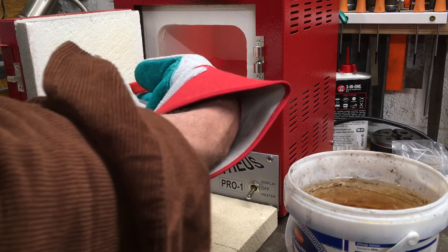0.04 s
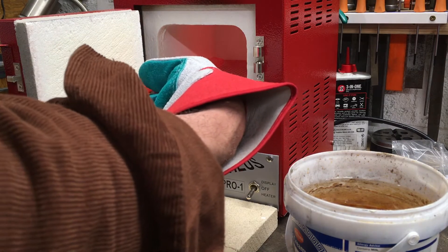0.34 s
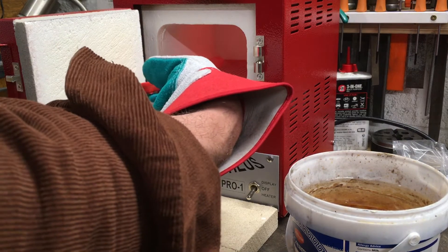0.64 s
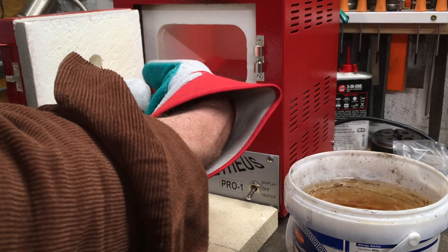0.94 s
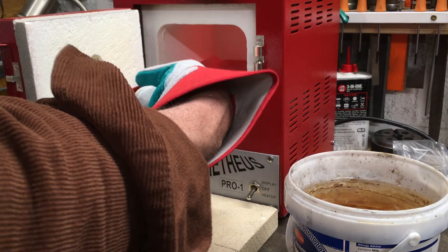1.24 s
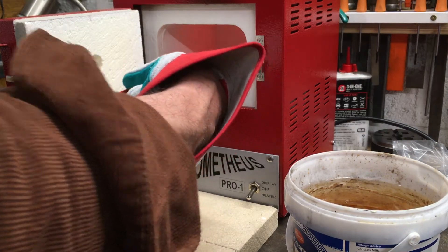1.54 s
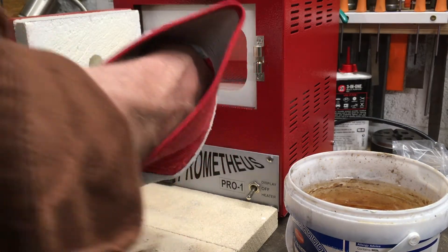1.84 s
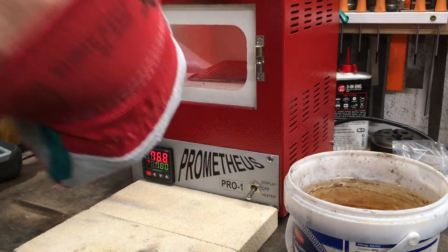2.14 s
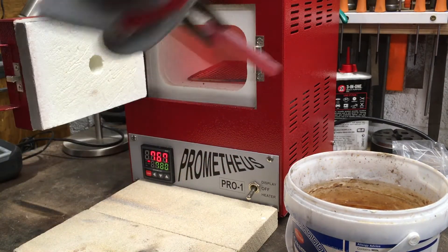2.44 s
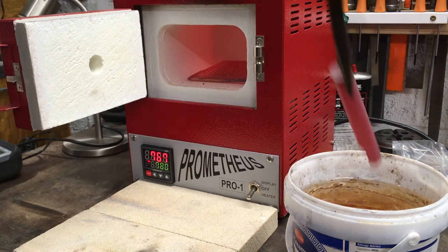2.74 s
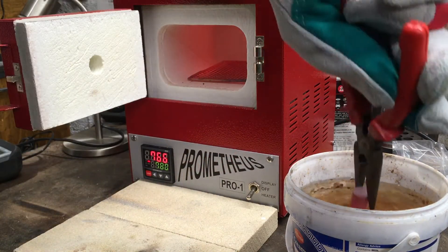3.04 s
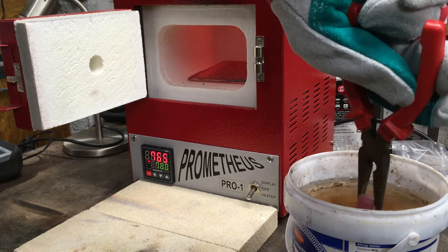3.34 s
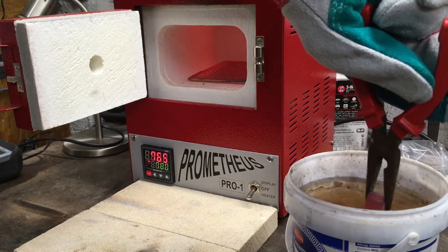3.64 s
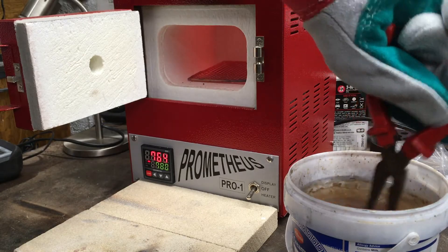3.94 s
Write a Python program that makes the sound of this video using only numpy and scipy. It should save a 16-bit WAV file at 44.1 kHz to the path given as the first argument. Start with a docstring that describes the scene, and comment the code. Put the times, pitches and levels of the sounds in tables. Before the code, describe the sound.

Hot steel sizzling in liquid is the main sound, arriving late. Until then a quiet workshop hums, with faint taps and scrapes of tongs from about 0.5 to 1.9 seconds and a barely audible distant engine rising. At 2.9 seconds the steel plunges in with chirping, spitting bubbles and a brief thin whistle. A fine hiss surges on over a low, growing boil until 4 seconds.

```python
"""A quiet workshop: still air, a low hum and a soft rush. Tongs tap, slide and squeak as they draw
glowing steel from a small kiln, while an engine gathers speed far away. Near 2.9 s the steel plunges
into a plastic bucket: steam bubbles chirp and spit, with a brief, thin whistle. They give way to a
fine sizzle of tiny collapses and steam on the hot metal, over a low, growing boil."""
import sys
import numpy as np
from scipy import signal
from scipy.fft import rfft, irfft
from scipy.io import wavfile

SR = 44100
rng = np.random.default_rng(int(sys.argv[2]) if len(sys.argv) > 2 else 0)


def pcm_store(signal):
    """Save signal as 16-bit PCM."""
    levels = np.round(np.clip(np.atleast_2d(signal), -1, 1) * 32767)
    wavfile.write(sys.argv[1], SR, levels.astype(np.int16).T)


N = 176400
T = np.arange(N) / SR


def amp(db):
    return 10 ** (np.asarray(db) / 20)

def unit(x):
    return x / np.sqrt(np.mean(x ** 2) + 1e-20)

def fader(points):
    """Gain over time from rows that start with seconds and end with dB."""
    rows = np.array(points)
    return amp(np.interp(T, rows[:, 0], rows[:, -1], left=-120))

def equalise(x, curve):
    """Shapes x with an EQ curve that falls steeply beyond its ends; rms 1."""
    hz, db = np.transpose(curve)
    log_hz = np.log(np.fft.rfftfreq(N, 1 / SR) + 1)
    outside = np.maximum(np.log(hz[0]) - log_hz, 0) + np.maximum(log_hz - np.log(hz[-1]), 0)
    gain = amp(np.interp(log_hz, np.log(hz), db) - 60 * outside)
    return unit(irfft(rfft(x) * gain, N))

def noise(curve):
    return equalise(rng.standard_normal(N), curve)

def wander(rate_hz):
    """Random modulation up to about the given rate; rms 1."""
    rolloff = np.exp(-(np.fft.rfftfreq(N, 1 / SR) / rate_hz) ** 2)
    return unit(irfft(rfft(rng.standard_normal(N)) * rolloff, N))

def clicks(per_s, spread_db):
    """Random clicks of uneven size; rms 1."""
    hits = (rng.random(N) < per_s / SR) * rng.choice([-1, 1], N)
    return unit(hits * amp(spread_db * np.minimum(rng.exponential(1, N), 4.5)))

def tone(points, jitter, rate_hz):
    """An unsteady sine that follows rows of seconds, Hz and dB."""
    times, hz, _ = np.transpose(points)
    pitch = np.interp(T, times, hz) * (1 + jitter * wander(rate_hz))
    release = np.clip((times[-1] - T) / .02, 0, 1)
    return np.sqrt(2) * release * fader(points) * np.sin(2 * np.pi * np.cumsum(pitch) / SR)

def add(mix, start_s, sound):
    part = mix[max(round(start_s * SR), 0):][:len(sound)]
    part += sound[:len(part)]


# Colours of the air, its high hiss and the rush. Each row: frequency in Hz, gain in dB.
AIR_EQ = [(22, -28), (40, -4.5), (64, -1.5), (87, -0.5), (161, -9), (263, -9), (416, -19), (775, -22),
          (1160, -19), (4870, -40.5), (15000, -38)]
HISS_EQ = [(2500, -10), (5000, -9), (9500, -12), (10500, -13), (12500, -3), (15500, -8.5)]
RUSH_EQ = [(300, -6), (650, -1.5), (850, -3.5), (1150, 1), (1550, -6.5), (2200, -16), (3500, -40)]
# The hiss comes up as the rush recedes. Each row: time in seconds, level in dB.
HISS_FADER = [(0, -107), (1.6, -88), (2.3, -76.5)]
RUSH_FADER = [(0, -65.5), (1.62, -66.5), (1.85, -77), (2.2, -79)]

def room_tone():
    """Still air, a faint hiss uncovered as the arm moves away, and a soft mid-range rush."""
    air = amp(-61.5) * noise(AIR_EQ)
    return air + fader(HISS_FADER) * noise(HISS_EQ) + fader(RUSH_FADER) * noise(RUSH_EQ)

# Swells and dips of the hum. Each row: time in seconds, level in dB.
HUM_FADER = [(0, -65.5), (.7, -58), (1.25, -55.5), (1.4, -66), (1.6, -57.5), (1.8, -57), (1.9, -64.5),
             (2.3, -58.5), (2.551, -65), (2.8, -56), (3.05, -68), (4, -65)]

def hum(pitch_hz=64.8):
    """One low, slowly wavering tone."""
    return tone([(s, pitch_hz, db) for s, db in HUM_FADER], jitter=.024, rate_hz=5.3)

# Light contacts. Each row: peak time in seconds, decay in seconds, thud, scrape and grit levels in dB.
TOUCH_HITS = [(0.47, 0.059, -56.5, -79, -88), (0.599, 0.0046, -59, -58.5, -68),
              (0.636, 0.002, -54, -78, -51), (0.646, 0.013, -47.5, -67, -57.5),
              (0.705, 0.039, -54, -91, -88), (0.803, .002, -78, -85, -63),
              (1.214, 0.0082, -51.5, -59.5, -51.5), (1.232, 0.027, -48, -61, -69),
              (1.249, 0.0033, -61, -63, -47.5), (1.476, 0.025, -54.5, -61.5, -59.5),
              (1.676, 0.029, -76, -67.5, -61.5), (1.766, 0.0043, -66, -66, -85),
              (2.741, .003, -75, -62, -79), (2.825, 0.0012, -78, -50, -92)]
# Colours of those three layers. Each row: frequency in Hz, gain in dB.
THUD_EQ = [(130, -12.5), (250, 3.5), (350, -4), (480, -17.5), (640, -7.5), (1000, -28)]
SCRAPE_EQ = [(400, 7), (950, -3), (1500, -9), (2400, 4), (3300, -7), (4300, -2), (5000, -11), (12000, -32)]
GRIT_EQ = [(5000, -9.5), (6400, -2), (7800, -10.5), (9100, 0), (10500, -7.5), (12800, 4), (15500, 2)]

def touches(attack_share=.17):
    """Tongs and glove make contact: a soft thud, a scrape and fine grit under one quick envelope."""
    thud = noise(THUD_EQ)
    scrape = equalise(clicks(per_s=8600, spread_db=4.8), SCRAPE_EQ)
    grit = equalise(clicks(per_s=6000, spread_db=3), GRIT_EQ)
    out = np.zeros(N)
    for peak_s, decay_s, thud_db, scrape_db, grit_db in TOUCH_HITS:
        age = (T - peak_s) / decay_s
        envelope = np.exp(-np.maximum(age, -age / attack_share))
        out += envelope * (amp(thud_db) * thud + amp(scrape_db) * scrape + amp(grit_db) * grit)
    return out

# Fine sliding hiss. Each row: time in seconds, level in dB.
SLIDE_FADER = [(.7, -88), (.87, -78), (1.0, -69), (1.19, -74.5), (1.62, -74.5), (1.9, -83)]

def tongs_slide():
    """The tongs slide in the kiln with patchy, ticking grit."""
    patches = amp(2.2 * wander(rate_hz=36))
    return fader(SLIDE_FADER) * patches * equalise(clicks(per_s=7200, spread_db=4.5), GRIT_EQ)

# The engine's two voices. Each row: time in seconds, pitch in Hz, level in dB.
ENGINE_GROWL = [(1.2, 205, -66), (1.74, 225, -63.5), (1.88, 236, -70), (2.1, 248, -59), (2.45, 272, -68.5),
                (2.97, 312, -65.5)]
ENGINE_WHINE = [(2.15, 348, -78.5), (2.3, 360, -63.5), (2.55, 380, -80.5), (2.68, 350, -84.5),
                (2.82, 356, -60), (3.05, 368, -67)]

def far_engine():
    """An engine gathers speed: a rough climbing tone, joined by a smoother one above."""
    growl = tone(ENGINE_GROWL, jitter=.036, rate_hz=47)
    roughness = unit(1 + .8 * wander(rate_hz=20))
    return growl * roughness + tone(ENGINE_WHINE, jitter=.0049, rate_hz=25)

# Two faint squeaks. Each row: time in seconds, pitch in Hz, level in dB.
RASP_GLIDE = [(1.41, 4100, -85), (1.484, 4400, -79), (1.495, 4530, -63), (1.508, 4500, -81),
              (1.68, 4600, -93)]
SQUEAK_GLIDE = [(1.765, 12550, -83), (1.8, 12100, -77), (1.85, 11000, -80)]

def tongs_squeaks():
    """The tongs rasp with one small ping; a thin squeak falls as the steel is drawn out."""
    rasp = tone(RASP_GLIDE, jitter=.028, rate_hz=360) * wander(rate_hz=150)
    return rasp + tone(SQUEAK_GLIDE, jitter=.006, rate_hz=900)

def bubble_cloud(low_hz, high_hz, sizes, per_s, cycles, glide, spread_db):
    """Bubbles of mixed sizes ring at random, each a short gliding ping; rms 1."""
    out = np.zeros(N)
    for hz in np.geomspace(low_hz, high_hz, sizes):
        age = np.arange(0, 1, hz / cycles / SR)
        envelope = np.sin(np.pi * age ** .61) ** 2
        ping = envelope * np.sin(2 * np.pi * cycles * (age + glide * age * (age - 1)))
        out += signal.oaconvolve(clicks(per_s / sizes, spread_db), ping * hz)[:N]
    return unit(out)

# The boil builds. Each row: time in seconds, level in dB.
BOIL_FADER = [(2.88, -69), (2.97, -54.5), (3.07, -52.5), (3.17, -46), (3.33, -43), (3.6, -37.5),
              (3.85, -38), (3.96, -35)]
# Its low, hollow colour. Each row: frequency in Hz, gain in dB.
BOIL_EQ = [(80, -8), (160, -8), (290, -9.5), (385, -2), (450, -5), (510, 3.5), (600, -0.5), (780, -1),
           (1100, -4), (1500, -5), (1950, -11), (2500, -10), (4000, -3), (8000, -57)]

def boil():
    """Larger bubbles churn in the bucket, thickened with noise."""
    cloud = bubble_cloud(222.7, 2517, sizes=26, per_s=2500, cycles=9.54, glide=.044, spread_db=.5)
    return fader(BOIL_FADER) * equalise(cloud + 1.13 * rng.standard_normal(N), BOIL_EQ)

# Surges of the sizzle. Each row: time in seconds, relative level in dB.
SIZZLE_FADER = [(2.883, -55), (2.898, -46.5), (2.909, -33.5), (2.975, -39.5), (3.0, -40), (3.035, -49),
                (3.092, -43), (3.112, -25), (3.183, -29.5), (3.195, -38), (3.335, -39), (3.385, -29.5),
                (3.49, -27.5), (3.625, -31), (3.72, -33.5), (3.825, -42), (3.85, -34.5), (3.935, -32.5),
                (3.96, -34), (4.0, -25)]
# Its colour at the plunge, once under, and as it settles. Each row: frequency in Hz, gain in dB.
PLUNGE_EQ = [(700, -23), (1150, -4.5), (1850, -10), (2650, -8.5), (4500, -2.5), (5840, 2), (6920, 0),
             (7600, -4.5), (8200, -2), (9660, 1.5), (10400, -6.5), (12300, -1), (14000, -1.5), (15800, -4)]
UNDER_EQ = [(2400, -9), (3000, -20), (3700, -19), (4750, -17), (5750, 3), (6200, -6.5), (6700, 5.5),
            (7400, -10.5), (8300, -0.5), (9600, 1.5), (10300, -7.5), (11500, -0.5), (13900, -2.5),
            (15800, -6.5)]
SETTLING_EQ = [(2650, -15), (4700, -10), (5350, -0.5), (6100, -3), (6650, 1), (7450, -7), (9600, -1),
               (10400, -8), (12100, -5.5), (15800, -10)]

def sizzle(filled_s=2.97, fill_s=.069, under_s=3.355, settled_s=3.656, crossfade_s=.11):
    """Tiny collapses and steam on the hot metal, changing colour as it goes under."""
    fizz = unit(clicks(per_s=11000, spread_db=2) + .78 * rng.standard_normal(N))
    plunge = equalise(fizz, PLUNGE_EQ)
    # The entry starts thin; its body fills in as the steel sinks.
    body = signal.sosfiltfilt(signal.butter(2, 2100, fs=SR, output="sos"), plunge)
    plunge -= np.clip((filled_s - T) / fill_s, 0, 1) * body
    under, settled = (np.clip((T - s) / crossfade_s + .5, 0, 1) for s in (under_s, settled_s))
    hiss = (1 - under) * plunge + (under - settled) * equalise(fizz, UNDER_EQ)
    hiss += settled * equalise(fizz, SETTLING_EQ)
    flicker_db = 1.36 * wander(rate_hz=100)
    return amp(flicker_db - .5) * fader(SIZZLE_FADER) * hiss

# Waves of small bubbles. Each row: time in seconds, level in dB.
SWARM_FADER = [(2.885, -87), (2.91, -33), (2.97, -30.5), (3.01, -38), (3.045, -50), (3.09, -40),
               (3.12, -30), (3.18, -35), (3.33, -42), (3.39, -42), (3.45, -46), (3.82, -48), (3.85, -31.5),
               (3.94, -36), (4, -30)]
# Their bright colour. Each row: frequency in Hz, gain in dB.
SWARM_EQ = [(2050, -25), (2400, -8), (3000, -2.5), (3700, 1), (4200, -2), (4800, -5.5), (6500, -27)]

def bubble_swarm():
    """Small bubbles crowd at the steel, each chirping downward."""
    cloud = bubble_cloud(2300, 5070, sizes=14, per_s=1600, cycles=13, glide=-.14, spread_db=1.5)
    return fader(SWARM_FADER) * equalise(cloud, SWARM_EQ)

# Foreground chirps. Each row: peak time in seconds, length in seconds, pitch in Hz, relative level in dB.
STEAM_CHIRPS = [(2.886, 0.0024, 4130, -30.5), (2.9073, .007, 3750, -20), (2.913, .004, 3450, -21.5),
                (2.9458, .003, 3237, -14.5), (2.9517, 0.0096, 3100, -16), (2.9585, .003, 2860, -30),
                (2.9673, .007, 2810, -15), (2.971, 0.0083, 3390, -19.5), (2.9804, .005, 2654, -11.5),
                (2.996, 0.0065, 2482, -16), (3.001, .006, 2395, -11), (3.009, .005, 2560, -17),
                (3.0205, 0.0045, 2695, -21.5), (3.122, .005, 2800, -16.5), (3.1266, 0.0084, 2374, -15),
                (3.143, 0.0073, 2503, -16), (3.1545, 0.0023, 2550, -14.5), (3.163, 0.0068, 3130, -17),
                (3.1708, 0.0068, 2390, -13), (3.180, 0.0048, 2563, -12), (3.183, .005, 2514, -12),
                (3.203, 0.0038, 3450, -21), (3.228, .004, 3475, -20.5), (3.279, 0.0033, 3840, -23),
                (3.3087, 0.0034, 3610, -17.5), (3.345, .004, 3856, -18.5), (3.387, 0.0041, 3735, -22),
                (3.3943, 0.0063, 3710, -20), (3.846, 0.0031, 3810, -17.5), (3.869, 0.005, 3740, -18.5),
                (3.894, 0.0037, 3660, -18), (3.906, 0.0051, 3486, -21.5), (3.923, 0.0028, 3580, -17)]

def steam_bubbles(sag_per_length=.062, roughness=.3, chirp_db=-3, spray_db=-17):
    """Each steam bubble swells, flutters, drops in pitch as it grows, and spits fine spray."""
    chirps, spray = np.zeros(N), np.zeros(N)
    flutter = .035 * wander(rate_hz=660)
    for peak_s, length_s, hz, db in STEAM_CHIRPS:
        age = np.arange(-2 * length_s, 2 * length_s, 1 / SR) / length_s
        swell = amp(db) * np.exp(-(age / .57) ** 2)
        own_flutter = np.roll(flutter, -round(peak_s * SR))[:len(age)]
        pitch = hz * (1 - sag_per_length * age + own_flutter)
        start_s = peak_s - 2 * length_s
        add(chirps, start_s, swell * np.sin(2 * np.pi * np.cumsum(pitch) / SR))
        add(spray, start_s, swell)
    chirps *= (1 + roughness * wander(rate_hz=700)) / np.sqrt(1 + roughness ** 2)
    chirps = signal.sosfiltfilt(signal.butter(10, 2120, "high", fs=SR, output="sos"), chirps)
    return amp(chirp_db) * chirps + amp(spray_db) * spray * noise(PLUNGE_EQ)

# A thin, rising whistle. Each row: time in seconds, pitch in Hz, level in dB.
WHISTLE_GLIDE = [(2.908, 12750, -39), (2.927, 13150, -32), (2.94, 13450, -36), (3.0, 14900, -48)]

def steam_whistle():
    """Steam whistles briefly as the steel enters."""
    return tone(WHISTLE_GLIDE, jitter=.009, rate_hz=650)

# Accents on the sizzle. Each row: peak time in seconds, level in dB.
SPURT_HITS = [(3.206, -29.5), (3.228, -30), (3.283, -29), (3.304, -24.5), (3.316, -30.5), (3.347, -27.5),
              (3.903, -24.5), (3.932, -25)]

def steam_spurts(width_s=.0029):
    """Steam escapes in very short bursts of bright noise."""
    envelope = sum(amp(db) * np.exp(-((T - s) / width_s) ** 2) for s, db in SPURT_HITS)
    return envelope * noise(PLUNGE_EQ)

# An upward sweep. Each row: time in seconds, centre frequency in Hz, level in dB.
SINGING_GLIDE = [(3.335, 4803, -40), (3.375, 5170, -30.5), (3.43, 6170, -30.5), (3.5, 8270, -37),
                 (3.63, 12670, -40)]

def singing_hiss():
    """A band of hiss climbs as the bubbles shrink."""
    return tone(SINGING_GLIDE, jitter=.08, rate_hz=760) * wander(rate_hz=2200)

def echoes(x, t60_s, predelay_s):
    """Sparse reflections that die away."""
    t = T[:SR // 2]
    taps = rng.standard_normal(len(t)) * (rng.random(len(t)) < 4000 / SR)
    taps *= (t > predelay_s) * amp(-60 * t / t60_s)
    return signal.fftconvolve(x, taps / (np.linalg.norm(taps) + 1e-12))[:N]

def scene():
    """The quench rings in the bucket and shares a small room with the tongs, over the ambience; mono."""
    quench = steam_bubbles() + sizzle() + singing_hiss() + steam_spurts()
    quench += bubble_swarm() + boil() + steam_whistle()
    bucket = amp(-8.5) * echoes(quench, t60_s=.022, predelay_s=.0008)
    near = quench + bucket + touches() + tongs_slide() + tongs_squeaks()
    room = amp(-11.5) * echoes(near, t60_s=.13, predelay_s=.005)
    ambience = hum() + far_engine() + room_tone()
    return (near + room + ambience)[None]

def record(dry):
    """A steep high cut takes off the very top."""
    high_cut = signal.firwin(601, 15830, window=("kaiser", 9), fs=SR)
    return signal.oaconvolve(dry, high_cut[None], "same")


dry = scene()
out = record(dry)
pcm_store(out)
```